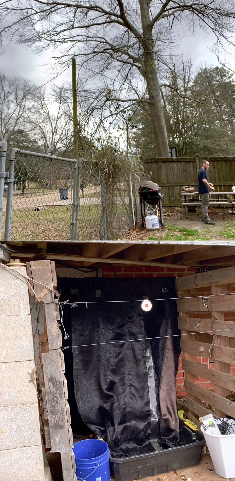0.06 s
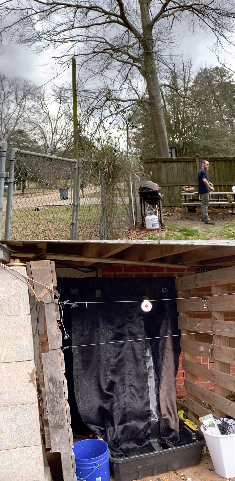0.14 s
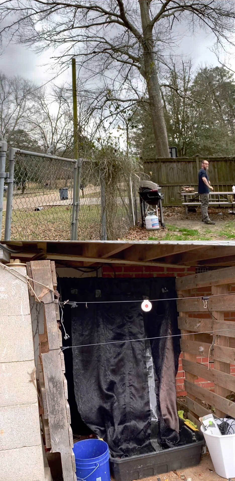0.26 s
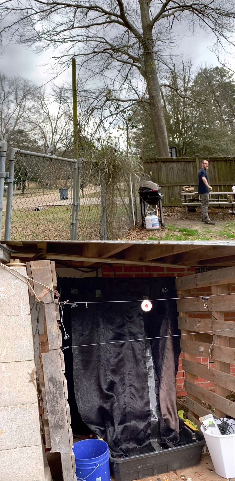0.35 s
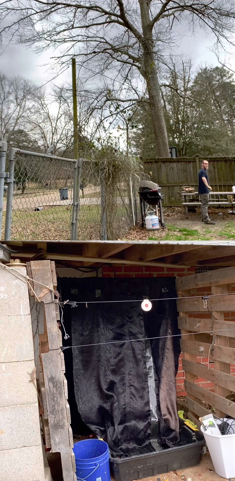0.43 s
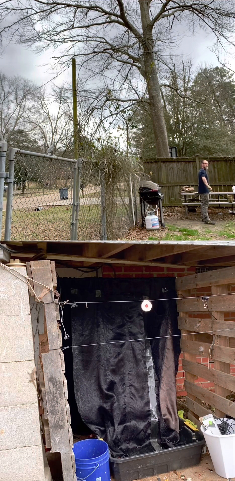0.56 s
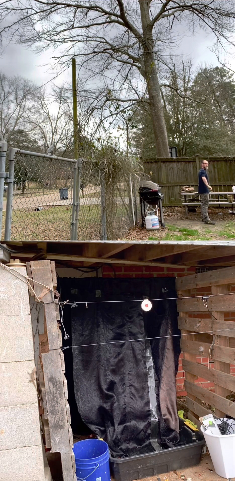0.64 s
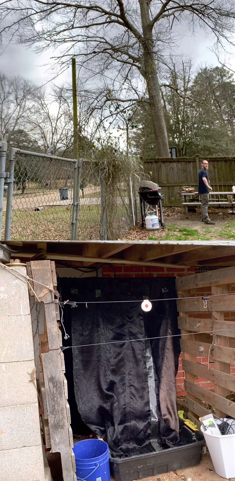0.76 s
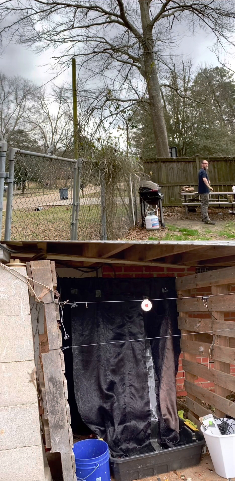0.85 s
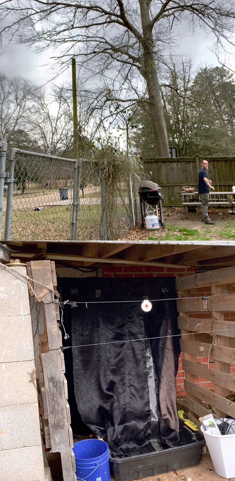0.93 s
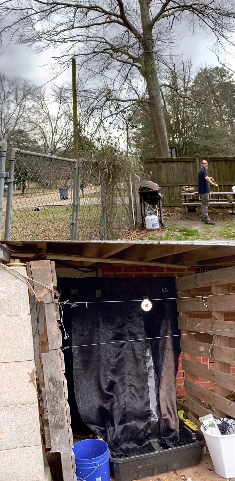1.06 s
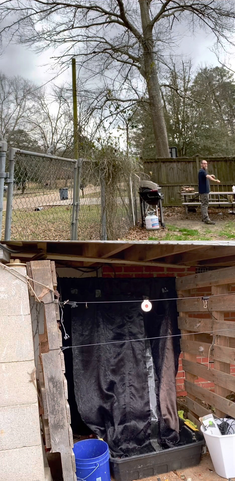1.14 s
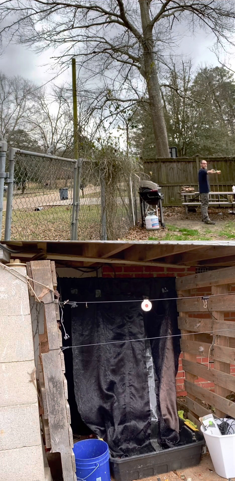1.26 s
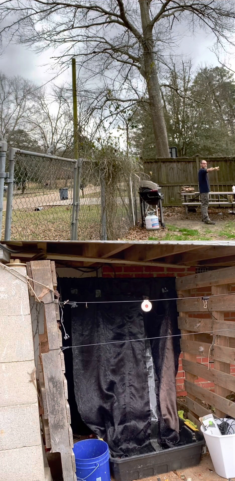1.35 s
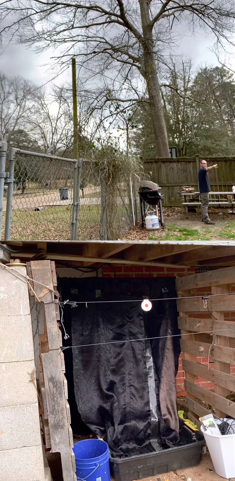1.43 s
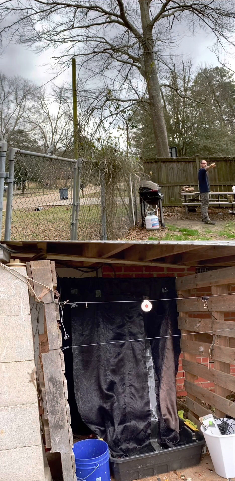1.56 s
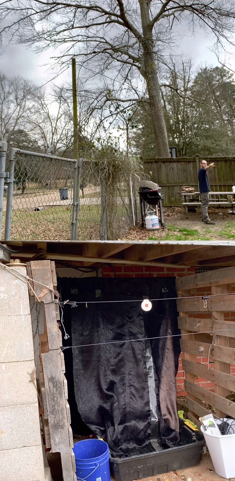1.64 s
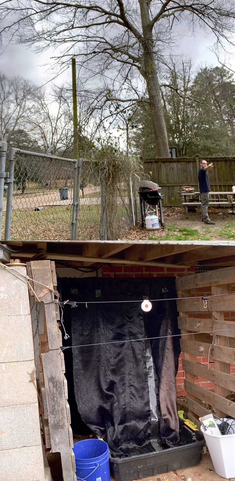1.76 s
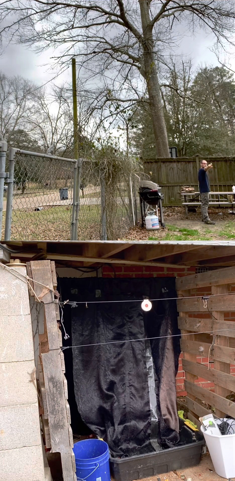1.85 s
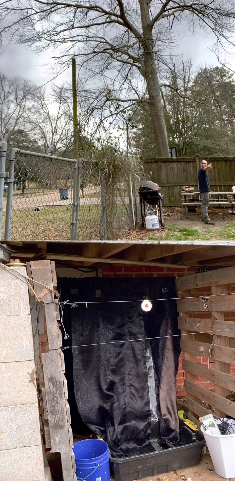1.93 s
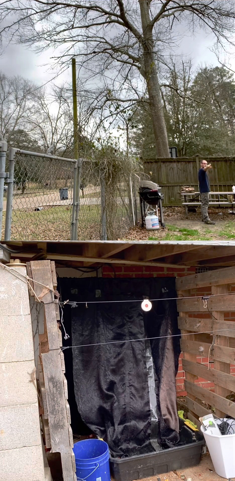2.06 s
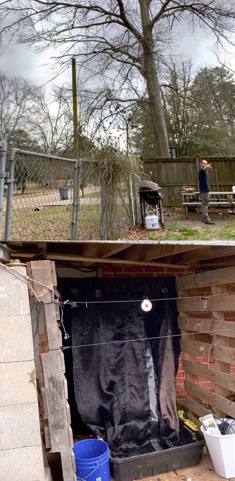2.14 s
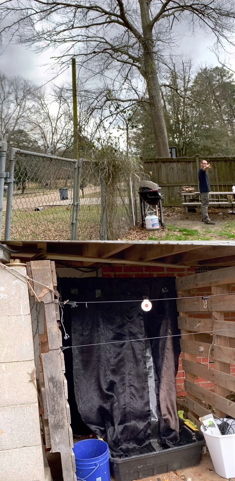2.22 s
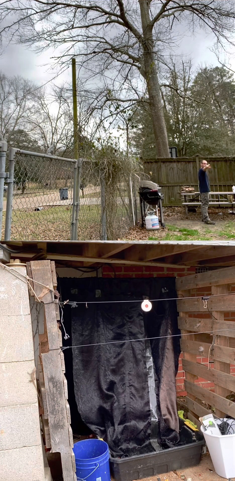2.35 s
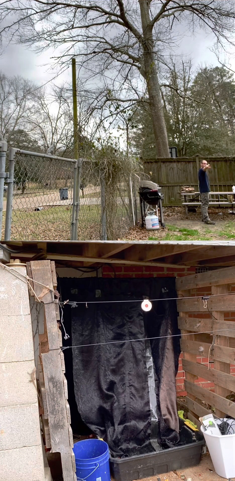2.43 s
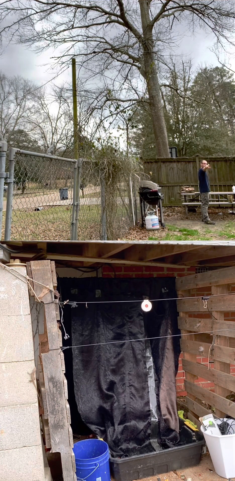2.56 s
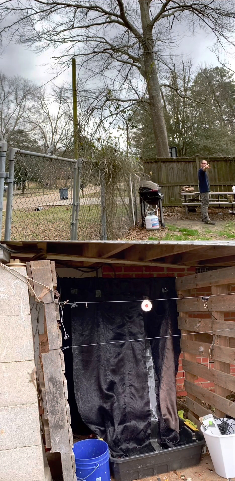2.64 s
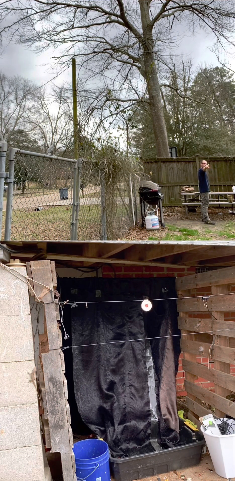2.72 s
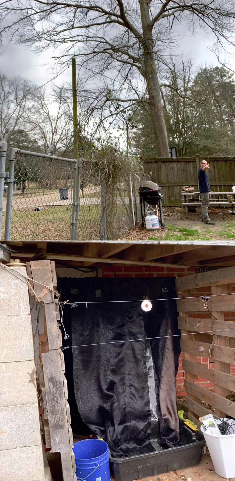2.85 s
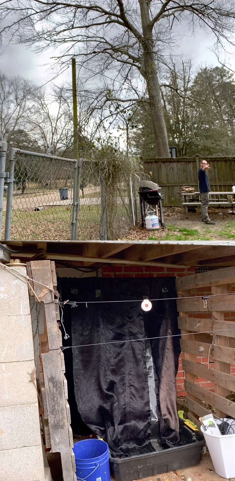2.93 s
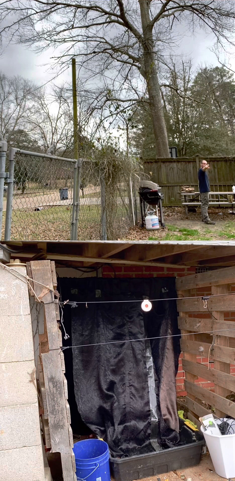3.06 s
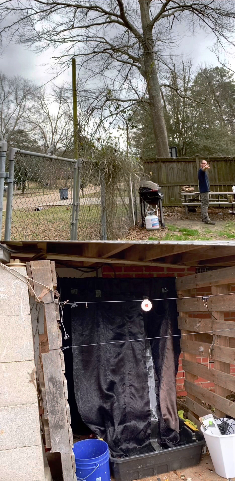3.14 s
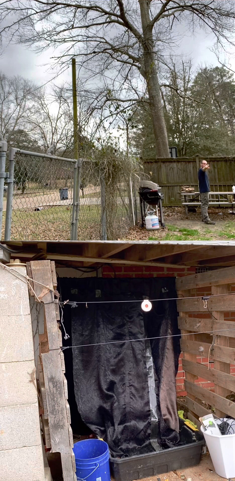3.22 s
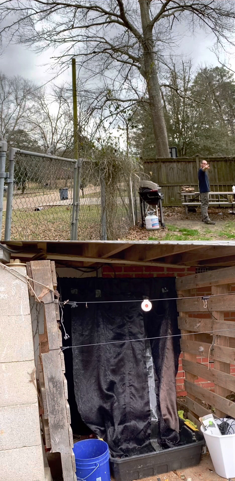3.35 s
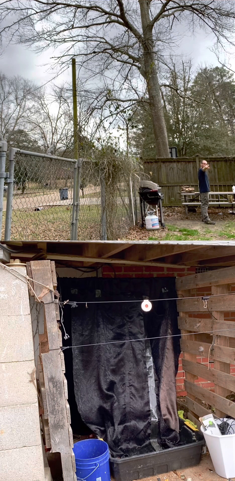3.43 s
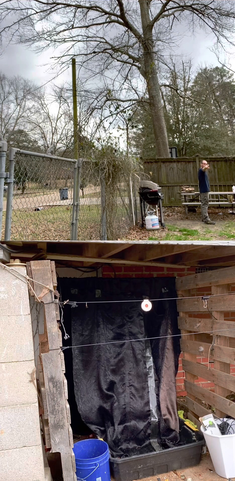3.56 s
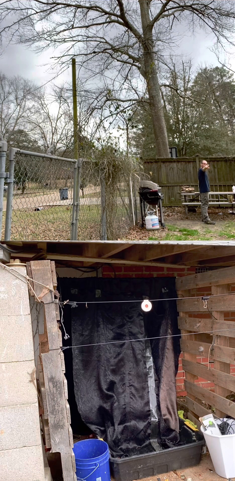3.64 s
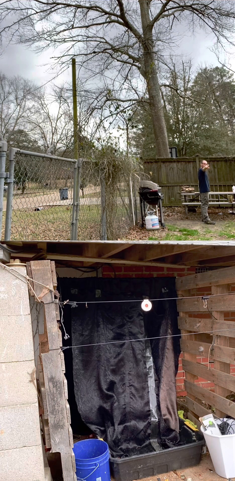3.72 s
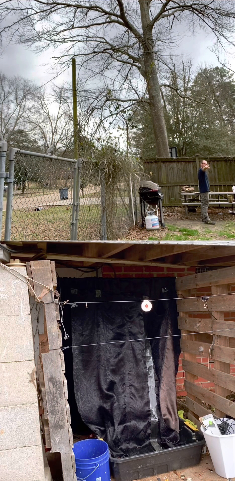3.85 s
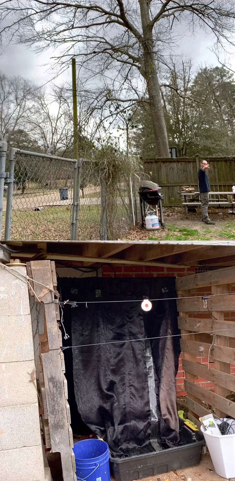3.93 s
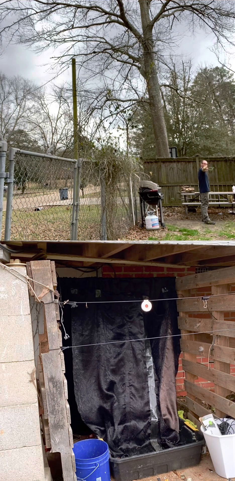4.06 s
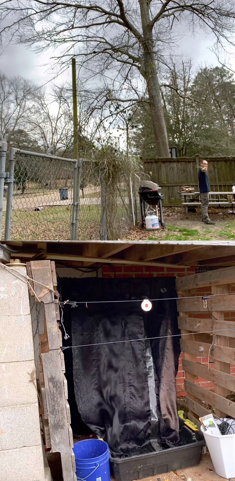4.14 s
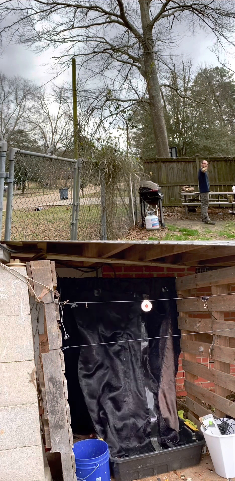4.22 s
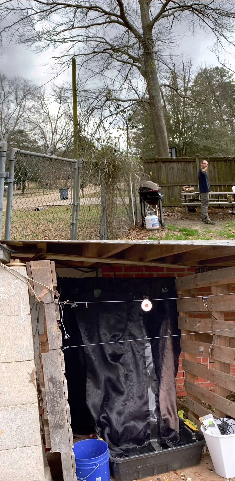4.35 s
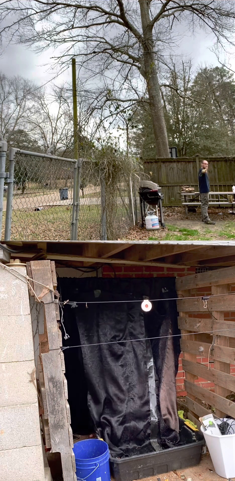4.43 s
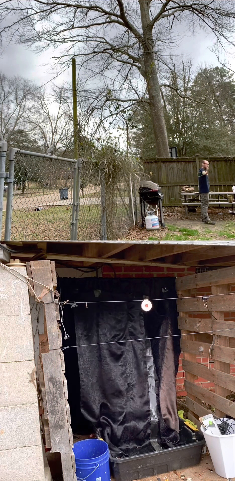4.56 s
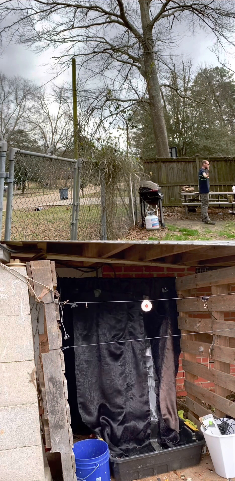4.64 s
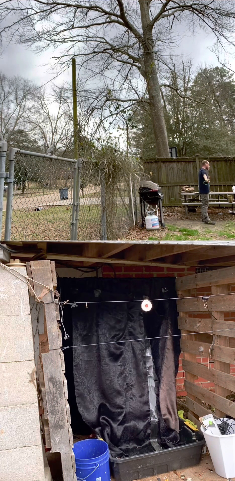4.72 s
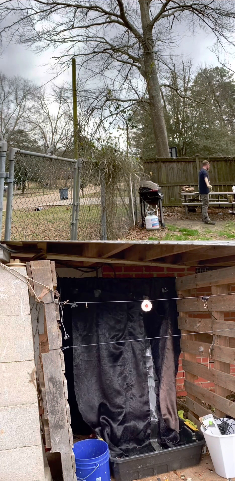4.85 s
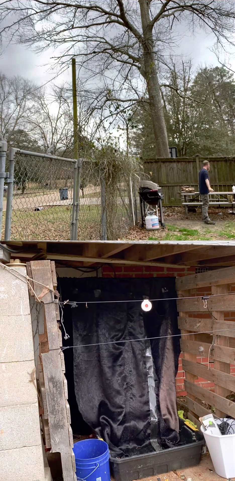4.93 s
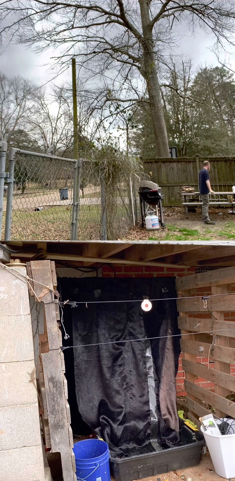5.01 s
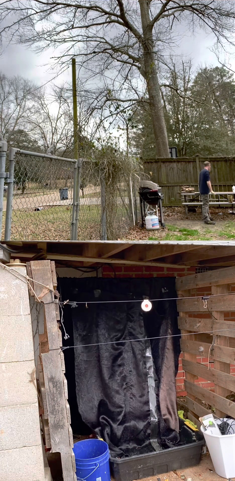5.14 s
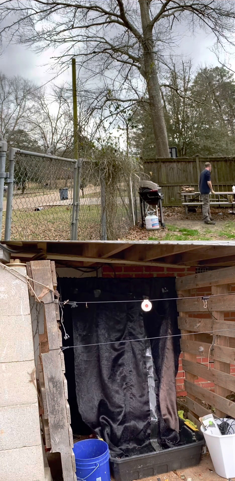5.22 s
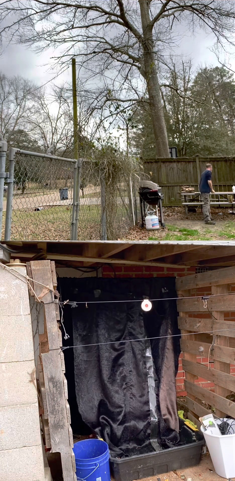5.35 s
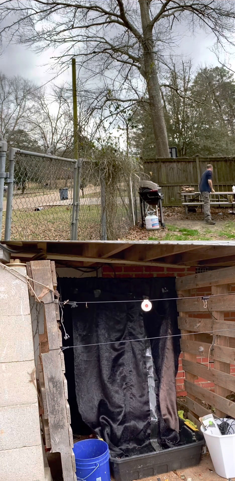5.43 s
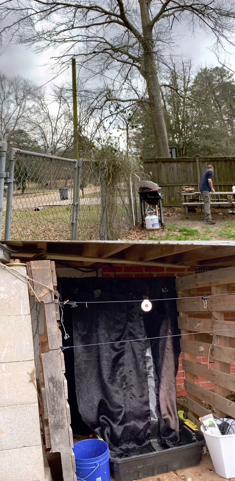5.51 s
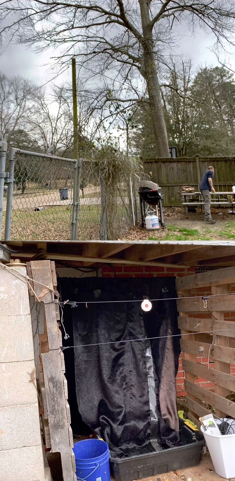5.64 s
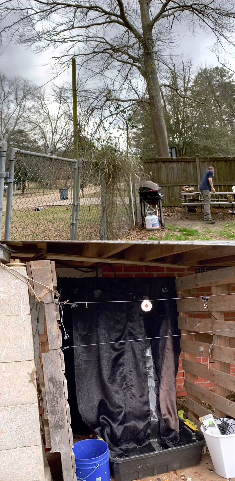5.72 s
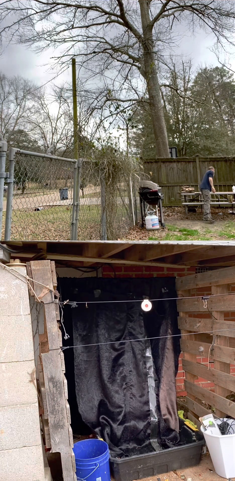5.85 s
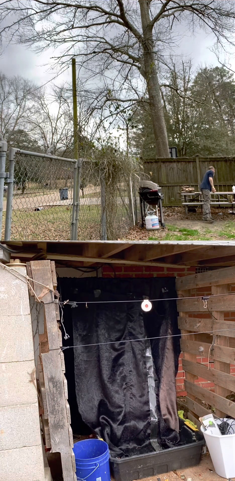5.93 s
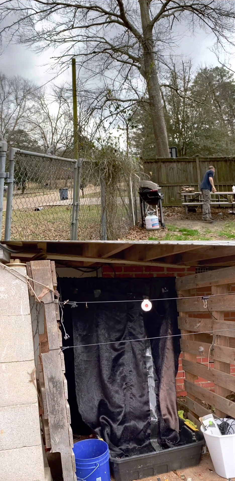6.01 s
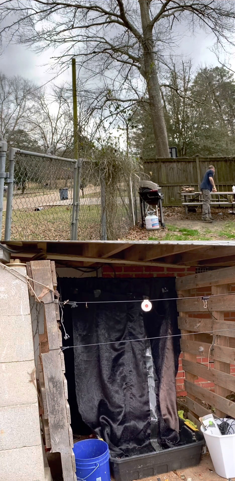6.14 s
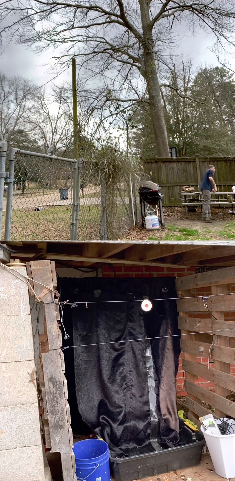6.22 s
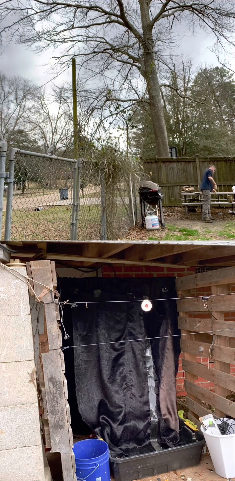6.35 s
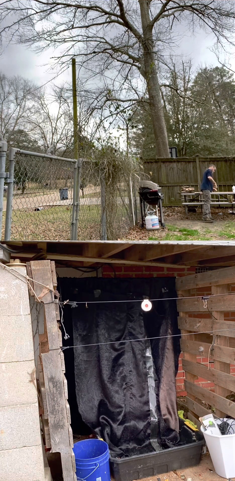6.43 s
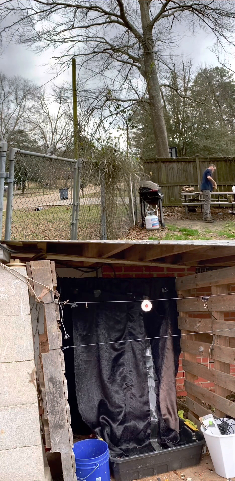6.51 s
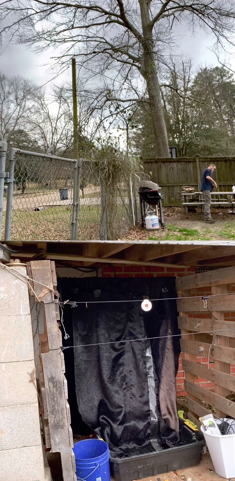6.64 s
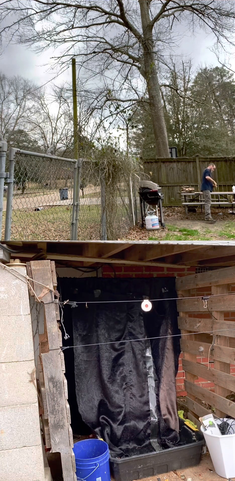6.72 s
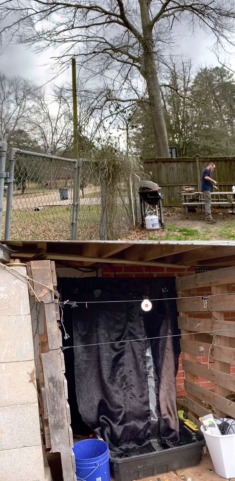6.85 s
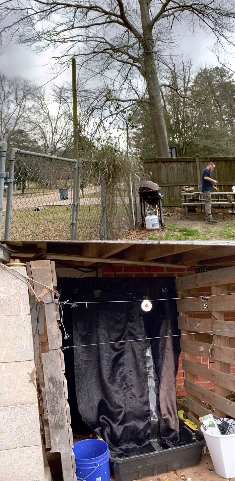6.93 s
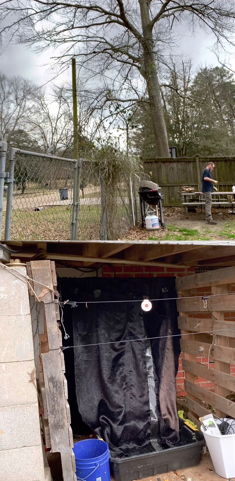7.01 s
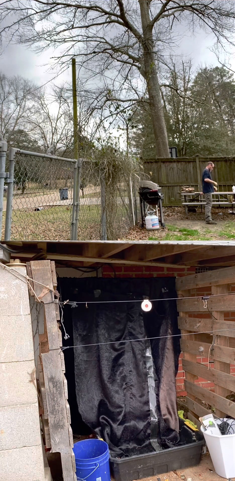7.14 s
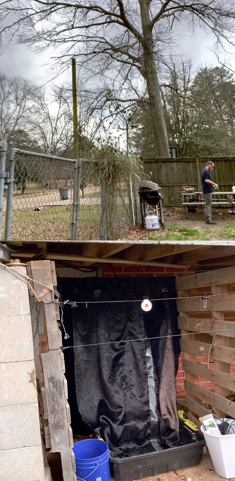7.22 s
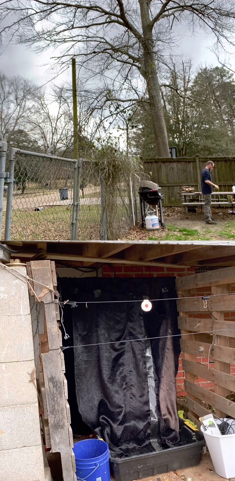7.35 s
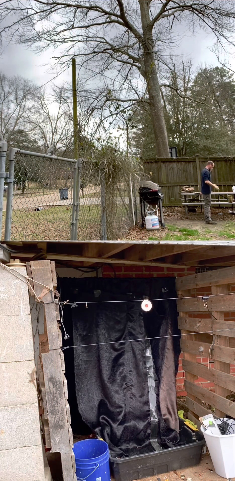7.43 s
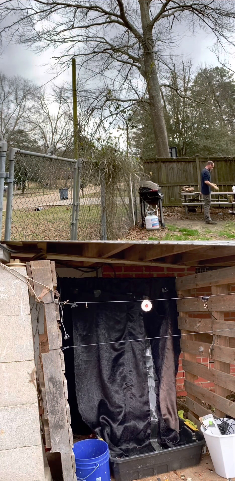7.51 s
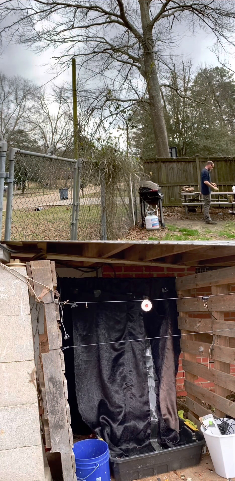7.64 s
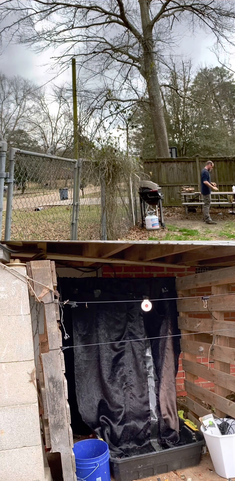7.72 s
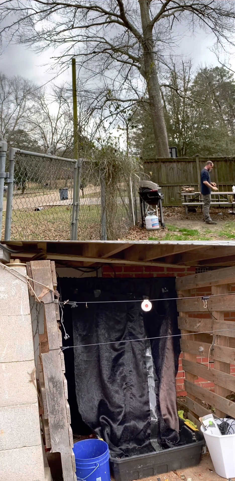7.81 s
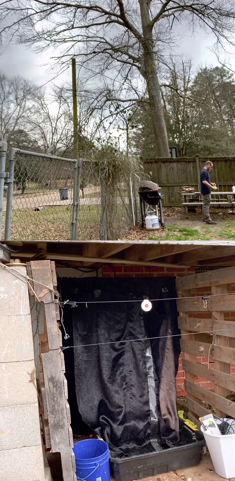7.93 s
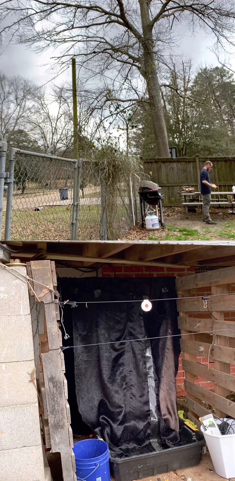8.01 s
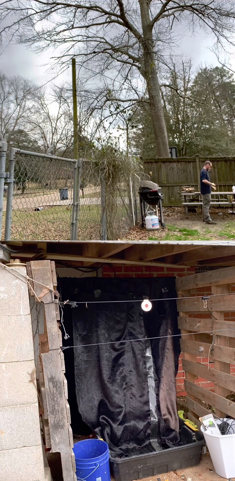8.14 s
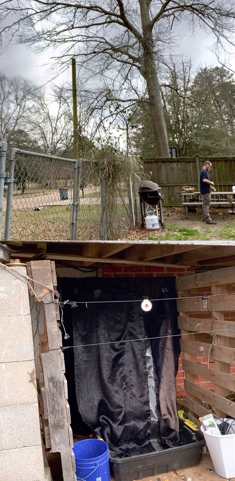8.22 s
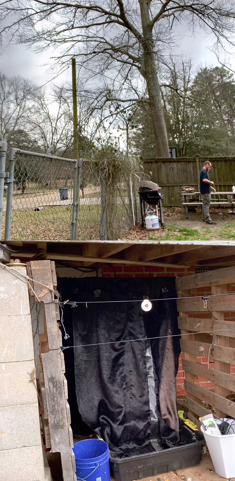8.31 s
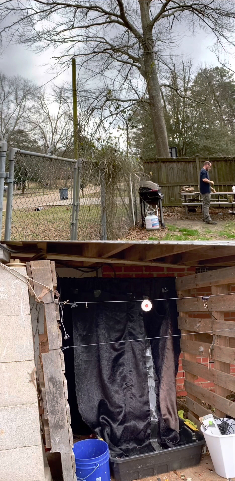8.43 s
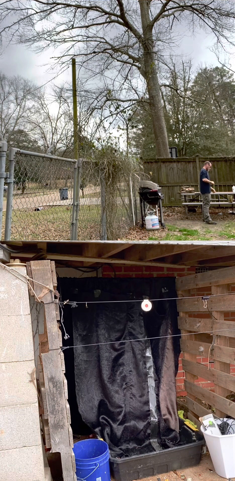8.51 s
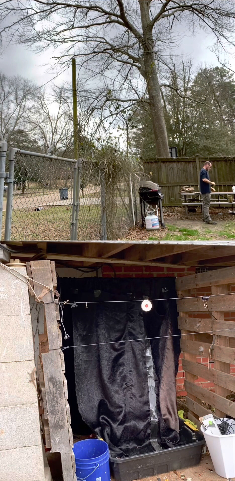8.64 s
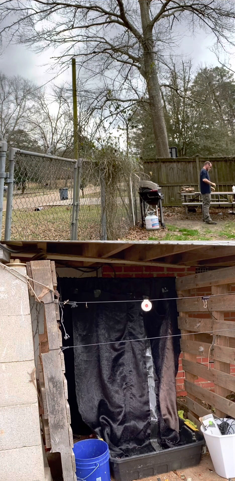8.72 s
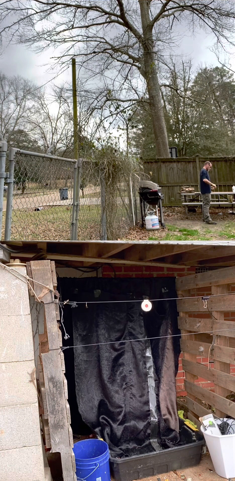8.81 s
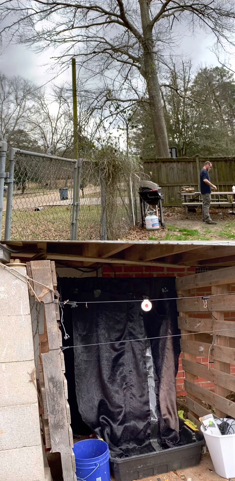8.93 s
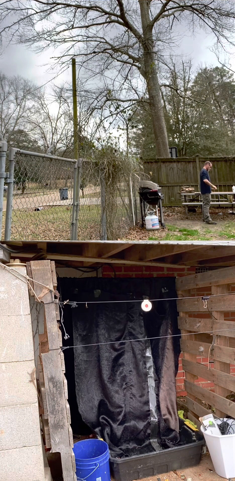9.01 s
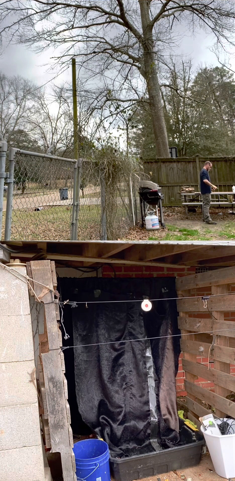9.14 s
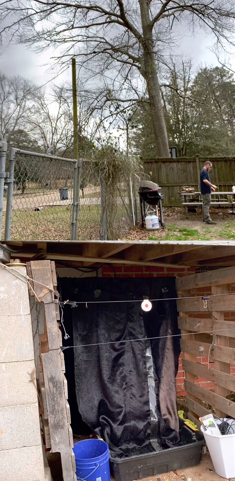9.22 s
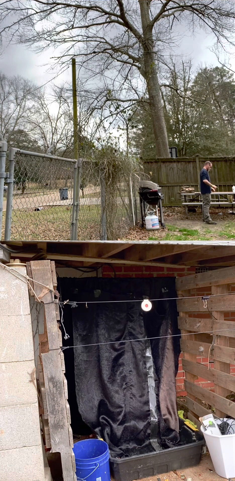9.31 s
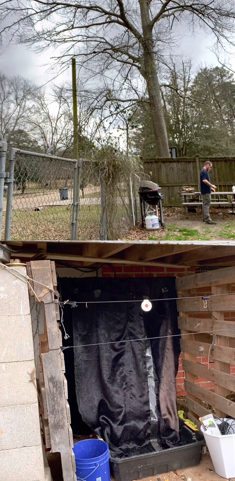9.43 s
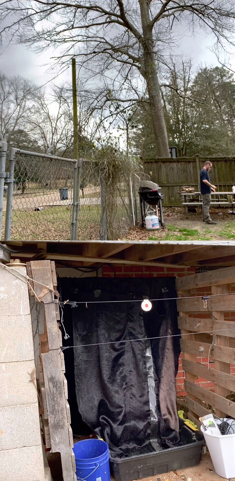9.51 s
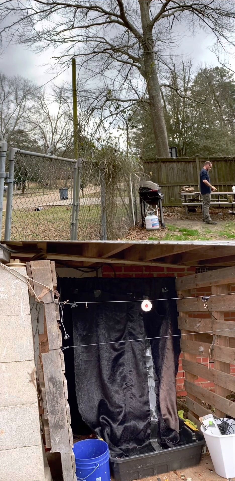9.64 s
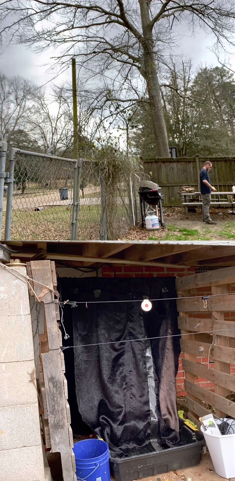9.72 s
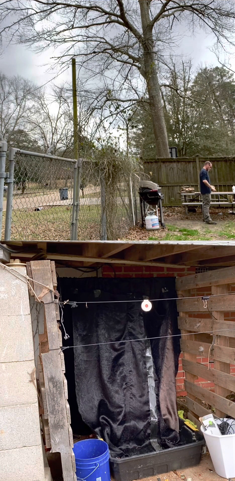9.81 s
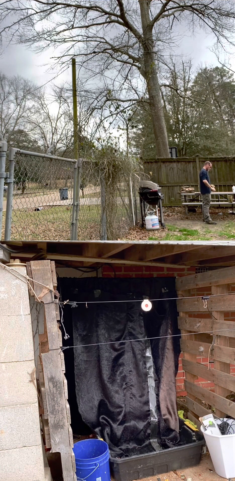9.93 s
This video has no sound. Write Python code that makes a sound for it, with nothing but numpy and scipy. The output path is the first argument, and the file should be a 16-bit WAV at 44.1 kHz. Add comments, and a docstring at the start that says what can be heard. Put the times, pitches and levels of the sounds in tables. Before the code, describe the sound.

A calm yard: low far-off engine hum, faint airy hiss, and thin sweet bird notes with quick trills. Suddenly a very loud, dry burst lasting under a second: ringing rubber pops, a hard crack on taut cloth, then ball clacks and dry rattle in a tray, with short fence echoes and a faint fabric brush. Afterwards only soft birdsong and traffic remain, picked up by one phone microphone.

```python
"""Far traffic hums and hisses first, and songbirds warble, churr and chip among trees round a backyard.
About four seconds in, slingshot bands snap and rustle close by: ringing pops and grainy noise.
The steel ball cracks into a curtain, then drops and bounces in the tray of a wooden catch box:
clicks and dry rattles coloured by cloth or wood. Fences slap echoes back and the curtain swishes as
filtered noise. The birds are gliding sines, the traffic is shaped noise with wavering drones."""
import sys
import numpy as np
from scipy import signal
from scipy.fft import rfft, irfft, next_fast_len
from scipy.io import wavfile
from scipy.ndimage import map_coordinates

SR = 44100
rng = np.random.default_rng(int(sys.argv[2]) if len(sys.argv) > 2 else 0)


def nominal_scale(level):
    """Amplitude ratio for a level in decibels (scalar or array-like)."""
    x = np.asarray(level, float) / 20
    return 10 ** x


def generate_wav(signal):
    """Clip the signal to [-1, 1] and save it as 16-bit WAV at the path in sys.argv[1]."""
    frames = np.transpose(np.atleast_2d(signal))
    scaled = np.clip(frames, -1, 1) * 32767
    pcm = np.round(scaled).astype(np.int16)
    wavfile.write(sys.argv[1], SR, pcm)


N = 439677  # length in samples

# the loose bands flap: start_s, body_db, hiss_db
FLAPS = [(4.162, -30, -35), (4.192, -31.5, -30.5), (4.225, -35.5, -40), (4.254, -37.5, -46)]
# the bands slap the fork: start_s, level_db, pitch_hz
SLAPS = [(4.169, -3.5, 1745), (4.1773, -8.5, 1505), (4.21, -17, 1600)]
# blows of the ball on the catch box: start_s, peak_db, thump_db, dullness_db_per_octave,
# fence_echo_db, curtain_share (0-1), rattle_t60_s
BLOWS = [(4.284, -2.5, -23, -0.5, -17.5, 0.34, 0.041), (4.4553, -24.5, -43.5, -12, -30, 0.33, 0.37),
         (4.562, -2, -33.5, 0, -21, 0, 0.015), (4.786, -16, -39, -1.5, -25, 0.1, 0.13)]
# crack of taut cloth: frequency_hz, level_db
CURTAIN = [(120, -32.5), (200, 3.5), (430, 6.5), (640, -8), (1300, -2), (1780, -5), (5360, -28.5),
           (10600, -51), (15000, -47.5)]
# clack of tray and slats: frequency_hz, level_db
TRAY = [(120, -52), (200, -7.5), (640, -8), (1200, -0.5), (2210, -6), (4550, -14.5), (6190, -23.5),
        (11000, -23), (15000, -43.5)]
# slap echoes from the fences: delay_s, level_db
FENCES = [(0.0649, 5.5), (0.074, 3), (0.127, -14), (.139, -14)]
# scatter close to the source: frequency_hz, t60_s
BOX_TAIL = [(1500, 0.096), (12000, 0.066)]
# reverberation of the yard: frequency_hz, t60_s
YARD_TAIL = [(3000, 0.93), (10000, 0.5)]
# slurred warbler notes, pitch bent through three points: start_s, length_s, first_hz, middle_hz, last_hz, level_db
SLURS = [(0.527, 0.029, 2550, 3400, 4120, -62.5), (0.645, 0.023, 2380, 2790, 3260, -59),
         (0.668, 0.031, 2000, 2410, 2800, -55), (0.691, 0.024, 2000, 2560, 3280, -53),
         (.755, 0.04, 1830, 1860, 1840, -65), (0.851, 0.037, 3120, 3006, 3000, -56.5),
         (0.902, .02, 3170, 3140, 3000, -60), (1.246, 0.016, 2260, 2740, 3200, -57),
         (1.306, 0.057, 2013, 2323, 2680, -58.5), (1.349, 0.037, 2675, 2600, 2200, -53),
         (1.676, 0.13, 2350, 2440, 2080, -64.5), (1.898, .09, 2280, 2615, 2300, -63),
         (2.092, 0.022, 2960, 3030, 2800, -59.5), (3.023, 0.047, 2000, 2406, 2480, -56),
         (3.048, 0.13, 2446, 2400, 2130, -49.5), (3.232, 0.047, 2000, 2280, 2560, -54),
         (3.271, 0.091, 2595, 2550, 2730, -47), (3.357, .05, 2700, 2040, 2500, -56.5),
         (3.488, 0.038, 2806, 2330, 1950, -52.5), (3.545, .072, 2780, 2150, 1804, -54),
         (3.7, .04, 2250, 2520, 2850, -51), (5.588, 0.041, 2270, 2430, 2540, -64),
         (5.949, .065, 3510, 3325, 2900, -63.5), (6.01, 0.17, 2940, 2625, 2300, -50.5),
         (6.161, 0.0375, 2260, 2150, 1980, -59), (6.206, 0.087, 2045, 2580, 2266, -53.5),
         (6.598, 0.035, 2125, 2466, 2480, -54), (6.704, 0.084, 3000, 2100, 2910, -58),
         (6.96, 0.091, 2100, 2650, 3200, -69), (7.238, 0.031, 2630, 2710, 2550, -64),
         (7.002, 0.072, 1793, 2594, 2340, -57.5), (8.828, 0.12, 2420, 2364, 2590, -51.5),
         (8.934, 0.15, 2544, 2595, 2000, -53.5), (9.167, .14, 2000, 2503, 2000, -52.5),
         (9.398, 0.033, 3470, 2700, 2140, -58.5), (9.414, 0.1, 2300, 2460, 2780, -61.5),
         (9.842, 0.047, 2900, 2807, 2600, -60)]
# notes that flick up to a top and sag to rest: top_s, top_hz, rest_hz, sag_length_s, level_db
HOOKS = [(0.804, 2825, 2090, .035, -51), (0.855, 3070, 2105, .03, -54), (0.901, 2900, 2100, .028, -57),
         (1.062, 3110, 2140, 0.12, -53)]
# fast warbles, starting low: first_s, last_s, turns_per_s, low_hz, high_hz, level_db
WARBLES = [(3.753, 3.846, 36, 2165, 2750, -57.5), (6.339, 6.472, 25, 2090, 2920, -53),
           (7.225, 7.339, 27, 2000, 2427, -58.5)]
# trills in two voices, the upper fading first: start_s, upper_db, lower_db
CHURRS = [(.36, -62, -73), (1.492, -61.5, -66), (2.513, -59, -66), (3.218, -61, -64), (4.83, -76, -68.5),
          (5.878, -62, -64.5), (6.761, -62, -69.5), (8.099, -63, -66.5), (8.855, -60, -60)]
# short chips: start_s, pitch_hz, level_db
CHIPS = [(1.333, 5370, -67), (5.696, 5530, -61), (6.319, 6700, -65), (7.183, 5370, -62),
         (7.981, 5320, -60.5), (8.835, 5760, -63), (9.627, 6250, -67)]
# runs of rising peeps: first_s, spacing_s, low_hz, high_hz, length_s, level_db
PEEPS = [(3.675, .1125, 3950, 5350, .052, -78), (4.985, .18, 3950, 4900, 0.04, -79),
         (7.417, .0566, 4500, 5600, 0.014, -77)]
# peeps in each run: count
PEEP_COUNTS = [5, 4, 12]
# thin far whistles: start_s, length_s, first_hz, middle_hz, last_hz, level_db
WHISTLES = [(2.29, 0.13, 9200, 8080, 9330, -71), (3.22, 0.26, 3436, 3285, 3080, -64),
            (3.52, .12, 3200, 3280, 3270, -69), (9.434, .11, 3405, 3390, 3360, -64),
            (9.58, .22, 3403, 3210, 3140, -67.5)]
# a rasping rising mew: start_s, length_s, first_hz, middle_hz, last_hz, level_db
MEW = (8.44, .25, 2850, 3580, 3820, -73.5)
# parallel glides into which its fast rasp splits the mew: offset_hz, level_db
MEW_SIDES = [(-450, -6), (0, 0), (400, -7)]
# a further warbler chattering behind: first_s, last_s, highest_hz, level_db
CHATTER = [(0.526, 0.742, 4180, -68.5), (1.008, 1.322, 3590, -68), (1.757, 2.354, 3030, -70.5),
           (3.402, 3.879, 2980, -66.5), (6.451, 7.355, 3162, -71.5), (9.455, 9.952, 3270, -67.5)]
# far engines, one list of points for each drone: time_s, pitch_hz, level_db
ENGINES = [
    [(0, 67, -45.5), (2, 78.37, -51), (3.4, 87.25, -45.5), (3.7, 83.5, -59)],
    [(0, 117.7, -44), (1.9, 115.3, -44), (2.6, 115.5, -55.5)],
    [(7.6, 47.1, -57.5), (8.33, 61.44, -39.5), (8.9, 62.27, -48), (9.3, 50.5, -45), (9.97, 50.74, -44.5)],
]
# faint wavering tones in the roar: pitch_hz, level_db
WHINE = [(860, -71), (970, -70)]
# traffic levels over time: time_s, rumble_db, tyre_roar_db
TRAFFIC = [(0, -45, -55.5), (3, -43, -54), (5.202, -47, -56), (9.97, -44.5, -57.5)]
# spectrum of the rumble: frequency_hz, relative_level_db
RUMBLE = [(12, -70), (20, -24), (42, -9.5), (65, 0.5), (211, -10), (330, -26), (430, -46.5), (730, -120)]
# spectrum of the tyre roar: frequency_hz, relative_level_db
ROAR = [(160, -36), (280, -2), (437, -6.5), (511, -3.5), (963, -3.5), (3000, -27.5), (4000, -30.5),
        (5200, -56), (8800, -120)]
# spectrum of the hiss of air and leaves: frequency_hz, relative_level_db
HISS = [(1500, -0.5), (4000, -4), (11000, -10.5), (15500, -15)]


def slingshot():
    """The released bands slap the fork in short ringing pops and flap with a grainy rustle."""
    out, t = np.zeros(N), np.arange(SR // 5) / SR
    for s, db, hz in SLAPS:
        swell = t / 0.00065 * np.exp(1 - t / 0.00044)
        ring = np.sin(2 * np.pi * hz * t) + 0.5 * np.sin(2 * np.pi * 1.93 * hz * t)
        pop = swell * (ring + 0.088 * rng.standard_normal(len(t)))
        fenced(out, s, nominal_scale(db) * pop, nominal_scale(db - 11.5) * pop, echo_db=-15.5, blur=0.1)
    add_flaps(out)
    return out


def add_flaps(out):
    """Rubber rustle: grainy noise in a body band and a hiss band, each flap rising and dying steeply."""
    s, body_db, hiss_db = np.transpose(FLAPS)
    lead_s, rise_db_per_s = 0.1, 1499
    since = np.arange(-SR // 10, SR // 2) / SR + s[0] - s[:, None]  # one row of time for each flap
    body_band, hiss_band = [(1450, 3900, -4.5), (5490, 10600, -32.0)], [(10000, 5300, 0)]
    for level, fall_db_per_s, band in ((body_db, 344, body_band), (hiss_db, 493, hiss_band)):
        noise = filtered(rng.standard_normal(N), lambda hz: modes(band, hz) ** 2)
        grains = unit(nominal_scale(2.8 * wobble(404)) * noise)
        slopes = np.minimum(rise_db_per_s * since, -fall_db_per_s * since)
        shape = nominal_scale(level[:, None] + slopes).max(axis=0)
        add(out, s[0] - lead_s, shape * grains[:len(shape)])


def ball():
    """Each blow is a click and a dry rattle coloured by cloth or tray, with a puff of low air."""
    out, t = np.zeros(N), np.arange(SR // 5) / SR
    for s, db, thump_db, dull_db, echo_db, cloth, rattle_t60 in BLOWS:
        def colour(hz):
            """Blends the cloth and tray spectra and tilts them by the dullness."""
            blend_db = cloth * along(CURTAIN, hz) + (1 - cloth) * along(TRAY, hz)
            return causal(nominal_scale(blend_db + dull_db * np.log2(1 + hz / 700)))

        decay = nominal_scale(-60 * t / 0.0066) + 0.33 * nominal_scale(-60 * t / rattle_t60)
        rattle = rng.standard_normal(len(t)) * decay
        rattle[0] += 3.5  # the click
        clack = filtered(rattle, colour)
        clack *= nominal_scale(db) / np.abs(clack).max()
        thump = nominal_scale(thump_db - 60 * t / 0.11) * np.sin(2 * np.pi * 140 * t)
        front = filtered(1.0 * (t == 0), colour)
        front *= nominal_scale(db) / np.abs(front).max()
        blur = np.clip(0.3 - 0.6 * cloth, 0.03, 1)  # the low tray reaches the fences by many paths
        fenced(out, s, clack + thump, front, echo_db, blur)
    return out


def causal(gain):
    """The minimum-phase response with the given gain: nothing sounds before the blow."""
    ceps = irfft(np.log(gain + 1e-6))
    half = len(ceps) // 2
    ceps[1:half] *= 2
    ceps[half + 1:] = 0
    return np.exp(rfft(ceps))[:len(gain)]


def fenced(out, s, sound, front, echo_db, blur):
    """A sharp sound; its front scatters nearby, slaps off the fences and fills the yard."""
    scatter = signal.fftconvolve(front, tail(BOX_TAIL))[:len(sound)]
    add(out, s, sound + nominal_scale(0.5) * scatter)
    t = np.arange(len(sound)) / SR
    far = filtered(front, lambda hz: modes([(1500, 3200, 0.00033)], hz) + 0.56)
    for delay, db in FENCES:
        # uneven boards blur far slaps more
        boards = rng.standard_normal(len(t)) * nominal_scale(-60 * t / (blur * delay))
        slap = signal.fftconvolve(far, boards / np.linalg.norm(boards))[:len(t)]
        add(out, s + delay, nominal_scale(echo_db + db) * slap)
    add(out, s + 0.015, nominal_scale(echo_db + 3) * signal.fftconvolve(front, tail(YARD_TAIL)))


def tail(decays):
    """A diffuse tail of energy 1; each frequency dies at its own speed."""
    hz, t, z = signal.stft(rng.standard_normal(SR // 2), SR, nperseg=128)
    t60 = along(decays, hz)[:, None]
    out = signal.istft(z * nominal_scale(-60 * t / t60), SR, nperseg=128)[1]
    return out / np.linalg.norm(out)


def swish():
    """The curtain swings back and brushes the box: grainy noise that starts at once and fades."""
    start_s, level_db, t60_s = 4.409, -53, 0.41
    t = np.arange(SR // 2) / SR
    cloth = filtered(rng.standard_normal(N), lambda hz: modes([(2000, 3700, 0)], hz) ** 2)
    grains = unit(nominal_scale(4.5 * wobble(200)) * cloth)[:len(t)]
    out = np.zeros(N)
    add(out, start_s, nominal_scale(level_db - 60 * t / t60_s) * grains)
    return out


def birds():
    """Every voice is a gliding sine; trunks and houses smear it into a tail, a wall repeats it once."""
    near, far = np.zeros(N), np.zeros(N)
    warbler(near, far)
    whistles(far)
    mew(far)
    chatter(far)
    churrs(near, far)
    chips(near)
    peeps(near)
    far *= nominal_scale(4.5 * wobble(150))  # air eddies make the notes flutter
    near *= nominal_scale(2.7 * wobble(110))
    wet = signal.fftconvolve(nominal_scale(-7) * near + nominal_scale(-0.5) * far, tail(YARD_TAIL))[:N]
    add(wet, 0.115, nominal_scale(-21.0) * (near + far))  # the wall
    return near + far + wet


def warbler(near, far):
    """Song of slurs, hooks and warbles; soft notes come from deeper in the trees."""
    notes = [slur(*r) for r in SLURS] + [hook(*r) for r in HOOKS] + [warble(*r) for r in WARBLES]
    for note in notes:
        loudest_db = np.max(np.array(note)[:, 2])
        tone(near if loudest_db > -59.5 else far, note, edge=0.0049)


def slur(start, length, first_hz, middle_hz, last_hz, db):
    """Rows of a note on a parabola of pitch, loudest in its middle."""
    u = np.linspace(-1, 1, num=11)
    slope, bend = (last_hz - first_hz) / 2, (last_hz + first_hz) / 2 - middle_hz
    hz = middle_hz + slope * u + bend * u ** 2
    return np.transpose([start + length * (u + 1) / 2, hz, db - 5 * u ** 2])  # ends 5 dB softer


def hook(top, top_hz, rest_hz, length, db):
    """Rows of a note that flicks up, then sags ever slower and fades."""
    u = np.linspace(0, 1, num=9)
    hz = rest_hz + (top_hz - rest_hz) * np.exp(-7 * u)
    sag = np.transpose([top + length * u, hz, db - 9 * u ** 2])
    flick = (top - 0.22 * length, (1 - 0.38) * top_hz, db - 9)  # climbs 38 % of the top pitch
    return [flick, *sag]


def warble(first, last, rate, low_hz, high_hz, db):
    """Rows of a note whose pitch swings up and down, louder at the tops."""
    s = np.linspace(first, last, num=40)
    swing = (1 - np.cos(2 * np.pi * rate * (s - first))) / 2
    return np.transpose([s, low_hz + (high_hz - low_hz) * swing, db - 4 * (1 - swing)])


def churrs(near, far):
    """Trills of rising notes, 42 a second, in a lower far voice and an upper near one."""
    for s, upper_db, lower_db in CHURRS:
        for k in range(11):
            start = s + 0.0071 + (k + rng.normal(0, 0.12)) / 42
            hz = 3330 + 380 * np.exp(-k / 3)
            db = lower_db - 0.28 * (k - 2) ** 2 + rng.normal(0, 1.1)
            lower = [(start, hz - 260, db - 1), (start + 0.0129, hz + 220, db)]
            tone(far, lower, edge=0.003)
            upper = [(start - 0.008, 4700, upper_db - 4 * k - 5), (start + 0.0016, 5150, upper_db - 5 * k - 0.5)]
            tone(near, upper, edge=0.0042)


def chips(out):
    """Very short rising sines, loudest in the middle."""
    for s, hz, db in CHIPS:
        rows = [(s - 0.003, 0.92 * hz, db - 15), (s + 0.003, hz, db), (s + 0.0076, 1.1 * hz, db - 11)]
        tone(out, rows, edge=0.001)


def peeps(out):
    """Evenly spaced upward glides, their closing level varied at random."""
    for (first, step, low, high, length, db), count in zip(PEEPS, PEEP_COUNTS):
        for s in first + step * np.arange(count):
            tone(out, [(s, low, db), (s + length, high, db - 2 + rng.normal(0, 3))], edge=0.0049)


def whistles(out):
    """Thin slurred notes with a faint octave above."""
    for note in [slur(*r) for r in WHISTLES]:
        tone(out, note, edge=0.03)
        tone(out, [(s, 2 * hz, db - 16.0) for s, hz, db in note], edge=0.02)


def mew(out):
    """Parallel glides beat together as a rasp."""
    for shift_hz, side_db in MEW_SIDES:
        tone(out, slur(*MEW) + [0, shift_hz, side_db], edge=0.02)


def chatter(out):
    """Quick steep slurs, rising or falling, about thirty-five a second."""
    for first, last, top_hz, db in CHATTER:
        count = int((last - first) * 35)
        for k, (jitter, low, high, rising) in enumerate(rng.random((40, 4))[:count]):
            s = first + (k + jitter) / count * (last - first)
            ends = [1950 + 350 * low, top_hz - 500 * high]
            start, end = ends if rising < 0.6 else ends[::-1]
            tone(out, [(s, start, db), (s + 0.025, end, db)], edge=0.0058)


def traffic():
    """Wavering engine drones over rumble, smooth tyre roar and faint hiss, all noise but the tones."""
    s, rumble_db, roar_db = np.transpose(TRAFFIC)
    t = np.arange(N) / SR
    rumble, roar, hiss = (unit(filtered(rng.standard_normal(N), lambda hz: nominal_scale(along(shape, hz))))
                          for shape in (RUMBLE, ROAR, HISS))
    rumble *= nominal_scale(np.interp(t, s, rumble_db) + 1.2 * wobble(4))
    roar *= nominal_scale(np.interp(t, s, roar_db) + 1.2 * wobble(2.0))
    hiss *= nominal_scale(-70.5 + 0.36 * wobble(3.1))
    return drones() + rumble + roar + hiss


def drones():
    """Far engines as gliding sines, and faint whines, all wavering in level."""
    out = np.zeros(N)
    for line in ENGINES:
        engine = np.zeros(N)
        tone(engine, line, edge=0.0016)
        out += engine * nominal_scale(3.15 * wobble(9))
    for hz, db in WHINE:
        phase = 2 * np.pi * np.cumsum(hz + 8 * wobble(5)) / SR
        out += nominal_scale(db + 3.5 * wobble(8)) * np.sin(phase)
    return out


def tone(out, rows, edge):
    """A gliding sine along (s, Hz, dB) rows with soft ends."""
    s, hz, db = np.transpose(rows)
    t = np.arange(s[0] - edge, s[-1] + edge, 1 / SR)
    fade = np.clip(np.minimum(t - t[0], t[-1] - t) / (2 * edge), 0, 1)
    phase = 2 * np.pi * (np.cumsum(np.interp(t, s, hz)) / SR + rng.random())
    level = np.sqrt(2) * np.interp(t, s, nominal_scale(db))  # dB are rms
    add(out, max(t[0], 0), level * fade * np.sin(phase))


def unit(x):
    """Scaled to rms 1."""
    return x / np.sqrt(np.mean(x ** 2) + 1e-20)


def along(points, hz):
    """(Hz, value) points read on a log frequency axis."""
    f, v = np.transpose(points)
    return np.interp(np.log(hz + 1), np.log(f + 1), v)


def wobble(rate):
    """A smooth random curve, rate knots a second."""
    knots = rng.standard_normal(int(N * rate / SR) + 4)
    return map_coordinates(knots, [np.arange(N) * rate / SR])


def filtered(x, response):
    """x times a complex response of frequency."""
    m = next_fast_len(len(x) + 8192)
    return irfft(rfft(x, m) * response(np.fft.rfftfreq(m, 1 / SR)), m)[:len(x)]


def modes(table, hz):
    """Response of broad resonances: (centre Hz, width Hz, dB)."""
    return sum(nominal_scale(db) * 1j * hz * w / (c * c - hz * hz + 1j * hz * w) for c, w, db in table)


def add(out, s, x):
    """Mixes x into out from time s."""
    part = out[round(s * SR):][:len(x)]
    part += x[:len(part)]


def scene():
    """Shot, curtain, birds and traffic at one microphone."""
    return (slingshot() + ball() + swish() + birds() + traffic())[None]


def top_cut(x):
    """Nothing passes above the cut-off."""
    return signal.sosfilt(signal.butter(12, 15800, fs=SR, output="sos"), x)


def record(dry):
    """A phone microphone whose treble rolls off, 6 dB down at 13.5 kHz."""
    heard = filtered(dry[0], lambda hz: 1 / (1 + (hz / 13500) ** 6))
    return top_cut(heard[None])


dry = scene()
out = record(dry)
generate_wav(out)
```